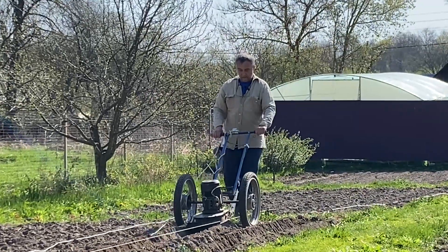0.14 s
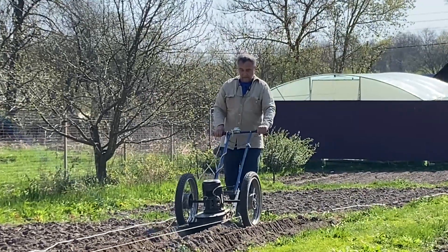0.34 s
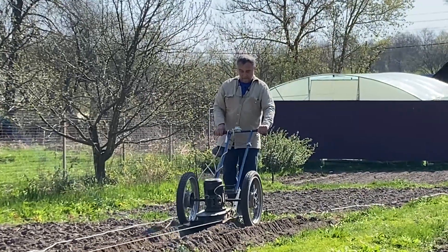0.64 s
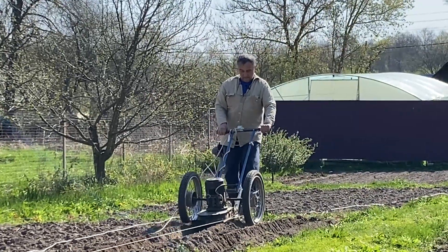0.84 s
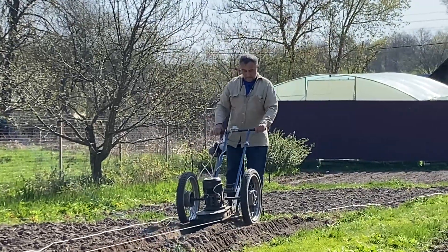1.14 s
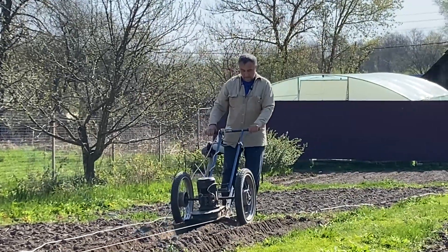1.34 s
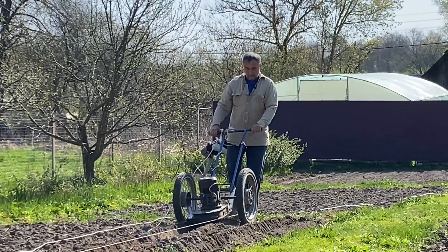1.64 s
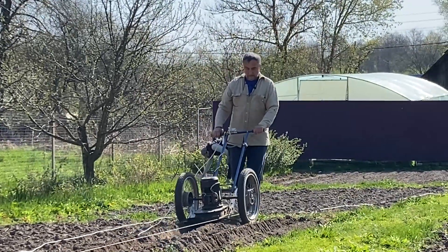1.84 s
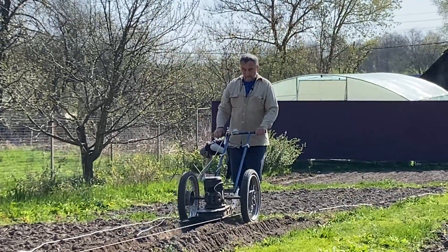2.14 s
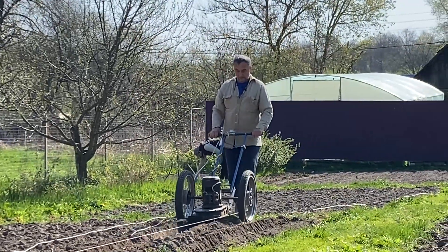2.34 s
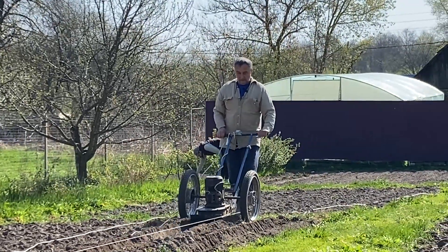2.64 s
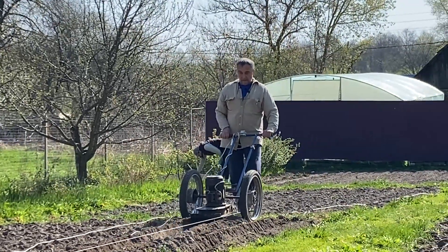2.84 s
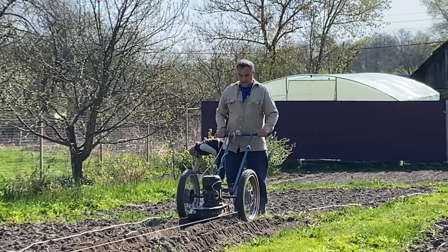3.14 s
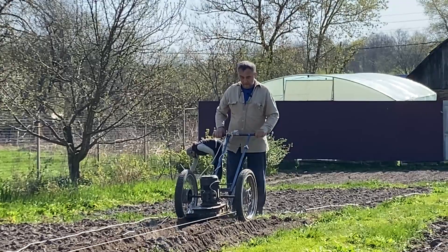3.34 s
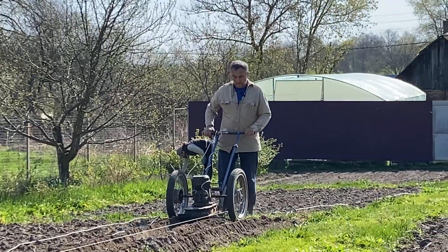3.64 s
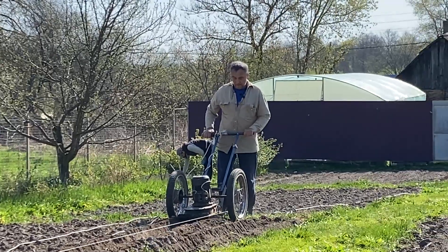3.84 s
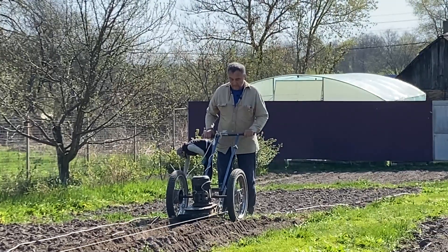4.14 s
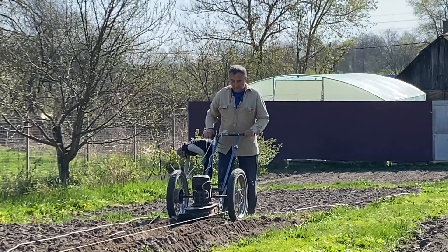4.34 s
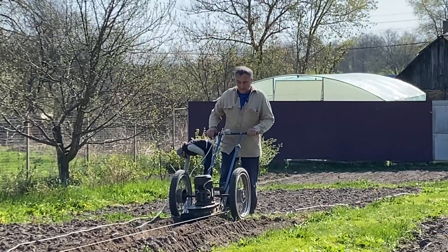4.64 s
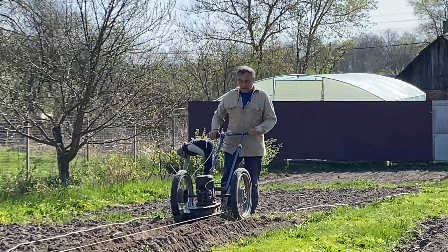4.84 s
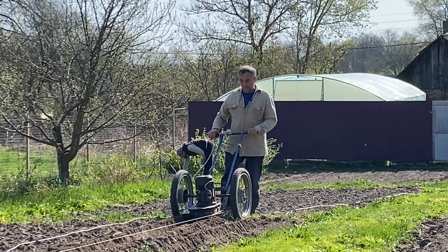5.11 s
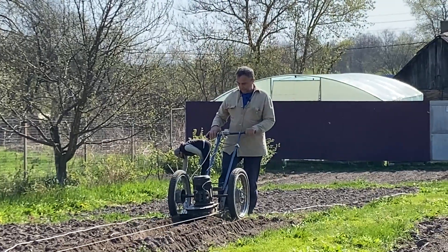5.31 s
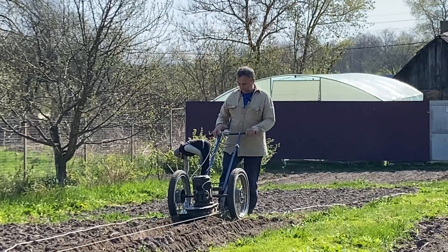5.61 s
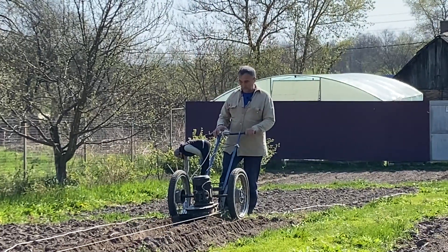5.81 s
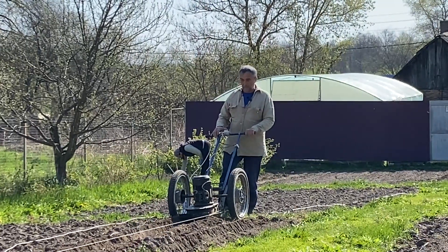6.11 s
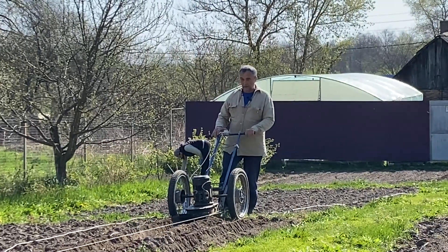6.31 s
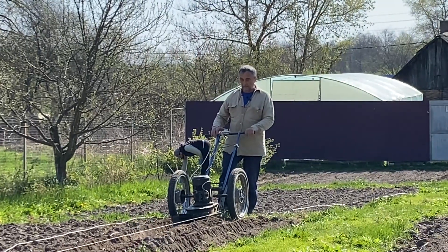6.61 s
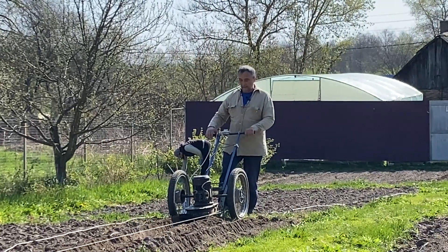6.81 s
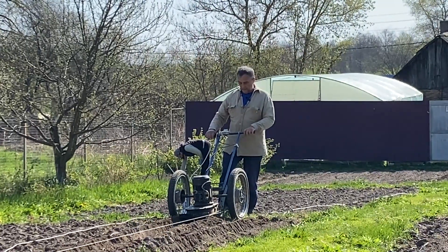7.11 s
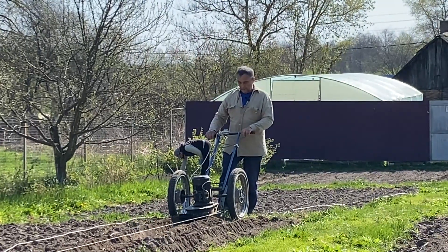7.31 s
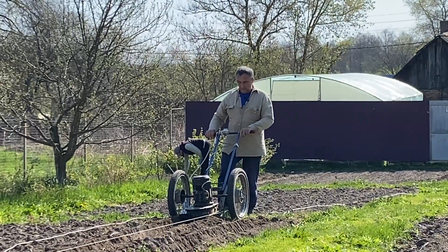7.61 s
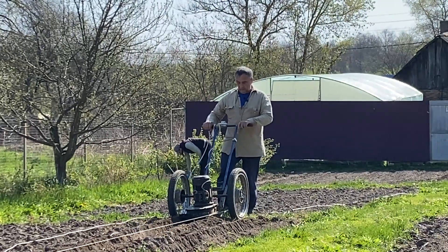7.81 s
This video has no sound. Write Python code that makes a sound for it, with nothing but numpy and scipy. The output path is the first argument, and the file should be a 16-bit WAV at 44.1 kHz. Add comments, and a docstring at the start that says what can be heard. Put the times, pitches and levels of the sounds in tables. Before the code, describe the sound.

From 0 to about 6.5 s an electric cultivator digs dry soil in a garden, a few metres from a single microphone. Its sound is a dense, loud metallic rattle of chassis, guard and tines, with bright scraping and spraying grit, a rough electrical buzz and gear whine near 640 and 1800 Hz. The colour drifts gently, and the low rattle grows slightly as it nears. Stones knock the tines at about 1.4, 1.7, 2.7, 2.9, 3.4, 4.6, 4.8, 5.1, 5.6, 6.1, 6.4 and 6.8 s; gears slap occasionally. Faint wind gusts brush the microphone. Switched off near 6.5 s, the machine loses load and pitch, stopping by 7.15 s with dull thumps from 6.8 s and small metallic clicks. Quiet garden air follows, with sparse clicks. A faint far bird whistles two short dipping notes near 7.6 and 7.7 s, then a lever snaps sharply at 7.8 s with a tiny high squeak.

```python
"""In a garden, an electric cultivator digs through dry soil a few metres from the microphone.
Random small impacts ring its chassis, frame, guard and tines; sine tones make the gear whine.
Stones strike the tines, gusts brush the microphone, and the colour glides as the machine rocks.
Switched off, it coasts to rest with thumps and clicks; a far bird whistles two notes, then a lever
snaps and a thin squeak sounds. Filtered noise makes the bed of quiet garden air."""
import sys
import numpy as np
from scipy import signal
from scipy.fft import rfft, irfft
from scipy.io import wavfile
from scipy.ndimage import uniform_filter1d

SR = 44100
rng = np.random.default_rng(int(sys.argv[2]) if len(sys.argv) > 2 else 0)


def to_wav(sig):
    """Store sig (one row per channel, or 1-D mono) as 16-bit WAV at the path in sys.argv[1].

    Samples outside -1..1 are clipped; the rate is SR.
    """
    pcm = np.clip(np.atleast_2d(sig), -1, 1) * 32767
    pcm = np.round(pcm).astype(np.int16)
    wavfile.write(sys.argv[1], SR, pcm.T)  # frames by channels


N = 351014
T = np.arange(N) / SR  # time [s]
HZ = np.fft.rfftfreq(8192, 1 / SR)  # frequencies at which filter gains are drawn [Hz]

# Levels in the tables are relative settings, ahead of wavering, colouring and mixing.
# quiet garden air: (frequency [Hz], level [dB])
AIR = [(12, -31.5), (20, -3.5), (54, 4), (92, -4), (274, -7), (324, -9.5), (631, -8.5), (2090, -22),
       (9930, -29.5), (14300, -28.5), (15500, -34)]
# low buffeting at the microphone: (frequency [Hz], level [dB])
BUFFET = [(10, -10.5), (33, -2.5), (70, -4.5), (140, -24.0), (500, -71.5)]
# gusts on the microphone: (time [s], half width [s], level [dB])
GUSTS = [(0.021, 0.058, -65), (1.41, 0.064, -52.5), (3.26, .035, -46), (3.33, .05, -54),
         (5.43, 0.043, -65.5)]
# far bird notes: (time [s], length [s], start pitch [Hz], lowest pitch [Hz], level [dB])
CHIRPS = [(7.566, .105, 3200, 2990, -79), (7.69, .075, 3170, 2990, -79)]
# dull echo off wall and trees: (frequency [Hz], level [dB])
ECHO = [(150, -5), (400, 1.5), (900, -4), (1500, -4), (2100, -15.5), (5000, -31.0)]

# thin squeak as the machine settles: (time [s], level [dB])
SQUEAK = [(7.772, -85), (7.79, -78), (7.822, -78), (7.838, -62), (7.85, -84), (7.87, -100)]
# released hand lever snaps back and bounces: (time [s], peak level [dB])
LEVER = [(7.7714, -44), (7.7738, -46), (7.784, -54)]
# what the lever rings with: (frequency [Hz], level [dB], 60 dB decay time [s])
LEVER_MODES = [(1180, -3, .025), (1590, -5, .065), (1840, -4, 0.098), (2780, -4, .035), (3500, -3, .035),
               (6100, -11, .03)]
# colour of the lever's crack: (frequency [Hz], level [dB])
CRACK = [(100, -15), (400, 1), (1500, 2), (3600, -5), (6500, -14), (9000, -28)]
# the last slow turns thump the chassis: (time [s], pitch [Hz], level [dB])
THUMPS = [(6.813, 290, -34), (6.849, 400, -34), (6.925, 340, -39), (7.038, 470, -46), (7.052, 288, -50),
          (7.105, 280, -57)]
# clicks of the stopping machine:
# (time [s], ringing knock level [dB], crunch level [dB], gritty top level [dB])
CLICKS = [(7.022, -55, -50, -59), (7.061, -60, -51, -54), (7.096, -73, -61, -70), (7.116, -67, -55, -66),
          (7.259, -53, -56, -49), (7.415, -49.5, -61, -51), (7.5148, -62, -68, -70), (7.749, -62, -74, -70),
          (7.8105, -53, -63, -78)]
# stones strike the tines: (time [s], ringing knock level [dB], crunch level [dB], gritty top level [dB])
STONES = [(1.384, -21.5, -28, -22), (1.652, -30, -23, -26), (2.694, -20.5, -23, -31),
          (2.931, -24, -16, -25.5), (3.374, -25, -23, -23), (4.64, -26.5, -16.5, -14.5),
          (4.839, -15, -24, -23.5), (5.1, -29, -15.5, -26), (5.609, -28, -19, -18), (6.076, -16, -20, -22),
          (6.405, -20, -23.5, -23), (6.797, -36, -29, -42)]
# what stones and clicks ring with: (frequency [Hz], level [dB], 60 dB decay time [s])
CLICK_MODES = [(525, 0.5, 0.077), (1050, -6, .025), (1300, -5.5, 0.038), (1515, 3.5, 0.043),
               (1880, -2.5, .06), (2800, -16.5, 0.044), (3510, -20, .04), (7100, -26, .2)]
# colours of each blow's crunch and of its gritty top: (frequency [Hz], level [dB])
CRUNCH = [(70, -44), (300, -2.5), (1200, 6.5), (3300, 1.5), (6500, -11), (9000, -22.0)]
GRITTY_TOP = [(3000, -25.0), (7000, -6), (10000, -9), (14500, -1.0)]

# shaft speed under load, ahead of coasting and unsteadiness: (time [s], speed [turns/s])
SPEED = [(0, 48.95), (1.6, 48.98), (2.1, 48.7), (2.75, 48.65), (3.2, 49.05), (4.8, 48.98), (5.4, 49.25)]
# tones of the drive: (multiple of the shaft speed, level [dB])
SHAFT_ORDERS = [(3, -57.5), (4, -53), (7, -64.5), (11, -46.5), (15, -54), (120, -59)]
# the two gear tones: (time [s], low mesh level [dB], high whine level [dB])
MESH = [(0, -35, -37.5), (.6, -41.5, -40), (1.5, -38.5, -37), (2.7, -33.5, -37.5), (3.4, -46.5, -43.5),
        (4.4, -37.5, -44), (5.2, -45, -44), (6.5, -45.5, -50)]
# gearbox rings up in surges as the load comes and goes: (time [s], level [dB])
GEAR_LOAD = [(0, -3), (.4, -5), (.7, -7), (1, -4), (1.2, -4.5), (1.65, -4.5), (1.8, -4.5), (2.2, -3.5),
             (2.4, -3), (2.6, -3), (2.85, -1.5), (3.05, -6), (3.3, -3.5), (3.47, -6), (3.7, -2.5), (4, -8),
             (4.35, -7.5), (4.6, -6), (4.85, -6), (5, -5.5), (5.6, -9.5), (6.4, -5.5)]
# the gears slap across their play: (time [s], peak level [dB])
GEAR_SLAPS = [(0.345, -18), (.483, -19), (.691, -16), (1.98, -13), (2.815, -15), (3.354, -16), (6.51, -17)]

# how hard the tines dig: (time [s], rattle level [dB], grit spray level [dB])
DIG = [(0, -25.5, -32.5), (1.15, -24, -33), (1.45, -25, -31), (2.1, -24, -31.5), (2.8, -24, -32),
       (3.1, -24, -32.5), (3.7, -24.5, -29.5), (4.05, -24.5, -30.5), (4.6, -24.5, -30.5),
       (5.2, -24.5, -29.5), (6, -24, -30), (6.35, -26, -30.5)]
# the tines bite into a clod (+) or slip through loose soil (-):
# (time [s], half length [s], rattle change [dB], spray change [dB])
BITES = [(0.986, 0.062, 1, 3.5), (1.547, 0.018, 2, 3.5), (2.005, 0.034, 0.5, 3), (2.28, 0.018, 0.5, 2.5),
         (2.403, 0.012, 0.5, 2), (3.112, 0.023, -2, -2.5), (4.36, 0.018, -2.5, -3.5),
         (4.64, 0.029, 1.5, 2.5), (4.747, 0.018, 3, 3.3), (4.83, 0.044, 1.5, 2.6), (5.9, 0.021, 2, 2.5),
         (6.054, .03, 2.2, 0.5), (6.407, 0.028, 3.5, 0.5), (6.77, 0.07, 4, 1.5), (6.964, 0.018, 3, 7)]
# two parts within the rattle: (time [s], guard level [dB], bracket level [dB])
PART_LEVELS = [(0, -6.5, -17), (1.3, -5, -17), (2.4, -7.5, -11.5), (3.3, -6.5, -11.5), (4.3, -5, -10),
               (4.8, -5.5, -10), (5.3, -5, -10.5), (6.4, -6.5, -12.5)]
# the tines sing as they lift clear of the soil:
# (time [s], main ring pitch [Hz], main ring level [dB], upper ring level [dB])
TINE_RING = [(0, 2860, -16.5, -24.5), (.7, 2890, -14, -20), (1.1, 2890, -13, -13), (1.45, 2900, -17, -18),
             (2, 2857, -8, -21), (2.75, 2896, -6, -18.5), (3.3, 2850, -8, -22), (3.7, 2820, -5.5, -16.5),
             (4.2, 2815, -10, -23), (4.8, 2880, -6, -20.5), (5.1, 2920, -15.5, -21),
             (5.55, 2750, -12.5, -13.5), (5.95, 2760, -10.5, -25), (6.4, 2710, -12.5, -28)]
# colours of chassis, frame, guard, scraping blades and grit: (frequency [Hz], level [dB])
CHASSIS = [(53, -43.5), (90, -13.5), (118, -22.5), (136, -8.5), (161, -9.5), (193, 2.5), (311, -2.5),
           (380, -7.5), (490, -26), (840, -120)]
FRAME = [(200, -43.5), (340, -21.5), (366, -11.5), (518, 2.5), (586, -5.5), (640, -1), (680, -7.5),
         (760, -9), (990, -30.5), (1670, -120)]
GUARD = [(410, -37.5), (700, -12.5), (776, -9), (822, 0.5), (952, -1), (1100, 0.5), (1210, -6.5), (1460, 2),
         (1600, -3.5), (1680, -1), (2180, -41.5), (3700, -120)]
SCRAPE = [(2180, -27.5), (3700, -19.5), (4040, -8), (4840, 1), (5450, -9.5), (5710, -5), (6610, 5),
          (7070, -0.5), (8270, -0.5), (8950, -9), (9500, -11.5), (12400, -41), (20900, -120)]
GRIT = [(5290, -42.5), (9000, -18.5), (9990, -5.5), (13200, 2), (15100, 6.5), (15700, -1.5)]
# metal resonances: (frequency [Hz], width [Hz], level [dB])
GEARBOX = [(1794, 46, 2.5), (1880, 62, -3.5), (2120, 90, -13.5)]
TINES = [(2785, 150, -1.5), (3090, 150, 0), (2510, 350, -5)]
BRACKET = [(1455, 53, 0)]
# tines and guard once the soil no longer damps them, ahead of squaring the gain:
# (frequency [Hz], width [Hz], level [dB])
FREE_RING = [(2785, 140, -1), (1570, 340, -2), (6350, 800, -11.5)]
# narrow resonances of the sheet metal covers: (frequency [Hz], width [Hz], boost [dB])
SHEET = [(940, 110, 1.5), (4830, 98, 1.5), (5880, 39, 6.5), (6560, 200, 0.5), (12850, 220, 6),
         (15000, 250, -1.5)]

# swells and hollows gliding as the machine rocks and its ground reflection shifts:
# (time [s], centre [Hz], level [dB])
GUARD_SWELL = [(0, 1002, -0.5), (3, 1003, 0.5), (4.3, 980, 3.5), (5.2, 1000, 1.5), (6.4, 1054, 1)]
TINE_SWELL = [(0, 3080, 4), (0.6, 3100, 2), (1.15, 3740, 2), (1.6, 3140, 3), (2.1, 3000, 4.5),
              (2.8, 3140, 4), (3.2, 2840, 5), (3.7, 2980, 4), (4.2, 2600, 4.5), (4.8, 2670, 2.5),
              (5.2, 2540, 7.5), (5.55, 3100, -0.5), (5.9, 2600, 3), (6.4, 2560, 5.5)]
LOW_HOLLOW = [(0, 3960, -4.5), (1.2, 4820, -5), (1.6, 4140, -6), (2.3, 3960, -7), (2.8, 4200, -5),
              (3.5, 4010, -6.5), (4.1, 3746, -2.5), (4.8, 3800, -4), (5.2, 3880, -1.5), (5.55, 4420, -7.5),
              (5.9, 3580, -1.5), (6.4, 3560, -5)]
MID_HOLLOW = [(0, 5230, -8), (0.75, 5380, -7.5), (1.2, 5960, -9), (1.7, 5550, -9.5), (2.3, 5200, -4.5),
              (2.8, 5750, -8.5), (3.2, 5340, -3), (3.6, 5760, -6.5), (4.05, 5100, -2), (4.8, 5840, -4),
              (5.3, 5300, -7.5), (5.65, 5140, -7), (6.4, 5190, -7)]
SCRAPE_SWELL = [(0, 7800, 5.5), (0.6, 7550, 4), (1.1, 7860, 6.9), (1.7, 7430, 6.5), (2.15, 6760, 4.3),
                (2.8, 7100, 2.5), (3.4, 6860, 5), (4.1, 6600, 8.2), (4.7, 6990, 5.5), (5.3, 6640, 2.3),
                (5.8, 6400, 1.8), (6.4, 5640, 3.5)]
GRIT_SWELL = [(0, 10170, 1), (.7, 10130, 2.5), (1.25, 10790, 1), (1.55, 12850, 2), (2.7, 14690, 4.5),
              (3.2, 14420, -4.5), (3.65, 12270, -1), (4.05, 10760, 5.5), (4.5, 12340, 0), (5.2, 14000, -2),
              (6.4, 11580, 0.5)]
GRIT_HOLLOW = [(0, 12360, -1), (.7, 12430, 0.5), (1.2, 15100, -3.5), (2.1, 11620, -1), (2.7, 13500, -4.5),
               (3.2, 11270, -4.5), (4.1, 10090, 1.5), (5.2, 10800, -6), (6.4, 10820, -5.5)]
# those bands: (path, half width [Hz])
GLIDES = [(GUARD_SWELL, 130), (TINE_SWELL, 540), (LOW_HOLLOW, 440), (MID_HOLLOW, 520), (SCRAPE_SWELL, 700),
          (GRIT_SWELL, 570), (GRIT_HOLLOW, 640)]

MAINS_HZ = 50
OFF_S = 6.461  # switch-off
COAST_S, COAST_BEND = 0.69, 1.5  # friction stops the shaft this long after the switch-off
UNLOAD_S = 0.031  # the tines stop pulling this soon after the switch-off
LOW_RISE_DB_PER_S = 0.6  # the chassis rattle grows as the machine comes nearer
TEETH, FINE_TEETH = 13, 37
UPPER_RING_HZ = 3493
GUARD_RIPPLE_DB, TINES_RIPPLE_DB = 2.2, 1.1
EDGE_HZ = 15780  # upper band limit of the recorder


def amp(db):
    """Decibels to gain."""
    return 10 ** (np.asarray(db) / 20)


def unit(x):
    """Scales to rms 1."""
    return x / np.sqrt(np.mean(x ** 2) + 1e-20)


def curves(rows, t=T):
    """The columns of a table, joined by straight lines in time."""
    s, *columns = np.transpose(rows)
    return [np.interp(t, s, c) for c in columns]


def add(mix, s, sound):
    """Mixes a sound in at time s."""
    part = mix[round(s * SR):][:len(sound)]
    part += sound[:len(part)]


def wander(rate_hz):
    """Random motion of rms 1, rolled off above the given rate."""
    f = np.fft.rfftfreq(N, 1 / SR)
    return unit(irfft(rfft(rng.standard_normal(N)) / (1 + (f / rate_hz) ** 2), N))


def spectrum(points):
    """Gain over frequency from (frequency [Hz], level [dB]) points."""
    f, db = np.transpose(points)
    return amp(np.interp(np.log(HZ + 1), np.log(f), db))


def resonances(modes):
    """Gain over frequency of a set of resonances, summed as powers."""
    power = 0
    for hz, width, db in modes:
        detuning = (HZ ** 2 - hz ** 2) / (width * (HZ + 1))
        power = power + amp(db) ** 2 / (1 + detuning ** 2)
    return np.sqrt(power)


def ring(x, gain):
    """Passes x through a causal filter of that gain, so blows ring on after they land; rms 1."""
    log_gain = np.log(np.maximum(np.r_[gain, gain[-2:0:-1]], 1e-5))
    minimum_phase = np.exp(np.conj(signal.hilbert(log_gain)))
    taps = np.fft.ifft(minimum_phase).real[:len(HZ)]
    return unit(signal.oaconvolve(x, taps)[:len(x)])


def resonate(x, hz, width_hz):
    """One resonance whose pitch may move: shifted to 0 Hz, through two equal poles, and back."""
    turn = np.exp(2j * np.pi * np.cumsum(hz * np.ones(N)) / SR)
    r = np.exp(-np.pi * width_hz / SR)  # width of each pole alone
    return unit((turn * signal.lfilter([1], np.poly([r, r]), x / turn)).real)


def decaying_modes(modes, t):
    """Sum of sines, each dying away at its own rate."""
    return sum(amp(db - 60 * t / t60) * np.sin(2 * np.pi * hz * t) for hz, db, t60 in modes)


def air(floor_db=-70, rumble_db=-72):
    """Quiet garden air, and low noise swelling in gusts as wind buffets the microphone."""
    wind = amp(rumble_db) * np.interp(T, [4.5, 7.3], [1, .2])  # the breeze eases
    for s, width, db in GUSTS:
        wind = wind + amp(db) * np.exp(-((T - s) / width) ** 2)
    buffet = ring(rng.standard_normal(N), spectrum(BUFFET))
    return wind * buffet + amp(floor_db) * ring(rng.standard_normal(N), spectrum(AIR))


def bird(lowest_at=.55, waver=.006, flutter_db=2.5):
    """Far, soft, slightly unsteady whistles that dip and turn up again."""
    out, sway, flutter = np.zeros(N), wander(60), wander(50)
    for s, length, start_hz, low_hz, db in CHIRPS:
        u = np.linspace(0, 1, round(length * SR))
        now = round(s * SR) + np.arange(len(u))
        glide_hz = low_hz + (start_hz - low_hz) * (1 - u / lowest_at) ** 2
        hz = glide_hz * (1 + waver * sway[now])
        level = amp(db + flutter_db * flutter[now]) * np.sqrt(abs(np.sin(np.pi * u)))
        add(out, s, level * np.sin(2 * np.pi * np.cumsum(hz) / SR))
    return out


def garden_echo(db=-69, t60=1.6, peak_s=6.6):
    """A dull echo off wall and trees: separate noise, swelling and fading about the switch-off."""
    return amp(db - 60 * abs(T - peak_s) / t60) * ring(rng.standard_normal(N), spectrum(ECHO))


def squeak(hz=7370, octave_db=-1):
    """A thin tone with its octave, swelling just before it stops."""
    angle = 2 * np.pi * np.cumsum(hz * (1 + .003 * wander(200))) / SR
    level = amp(curves(SQUEAK)[0]) * (T > SQUEAK[0][0]) * (T < SQUEAK[-1][0])
    return level * (np.sin(angle) + amp(octave_db) * np.sin(2 * angle))


def lever(crack_db=1, crack_t60=0.033):
    """The lever's snaps: a sharp crack of noise together with the lever's own ringing."""
    out, t = np.zeros(N), np.arange(SR // 5) / SR
    metal = decaying_modes(LEVER_MODES, t)
    for s, db in LEVER:
        crack = ring(rng.standard_normal(len(t)), spectrum(CRACK))
        snap = metal + amp(crack_db - 60 * t / crack_t60) * crack
        add(out, s, amp(db) * snap / abs(snap).max())
    return out


def tines_tail(db=-75.0, t60=.7, peak_s=7.14):
    """Faint undamped ringing of tines and guard: noise that swells as the shaft stops, then fades."""
    level = amp(db - 60 * abs(T - peak_s) / t60 + 2 * wander(40))
    return level * ring(rng.standard_normal(N), resonances(FREE_RING) ** 2)


def thumps(rise_s=.004, t60=.07):
    """Short dull notes of the chassis, each a decaying sine."""
    out, t = np.zeros(N), np.arange(SR // 5) / SR
    for s, hz, db in THUMPS:
        level = amp(db - 60 * t / t60) * np.minimum(t / rise_s, 1)
        add(out, s, level * np.sin(2 * np.pi * hz * t))
    return out


def knocks(rows, crunch_t60, knock_t60, grit_t60, rise_s=0.00072, lowest_hz=220):
    """Each blow is a knock that rings the metal and a short crunch, with grit on top."""
    out, t = np.zeros(N), np.arange(SR // 5) / SR
    metal = decaying_modes(CLICK_MODES, t)
    for s, *levels_db in rows:
        burst = rng.standard_normal(len(t)) * amp(-60 * t / crunch_t60) * (1 - np.exp(-t / rise_s))
        # knock and grit shorten the burst by a further decay of their own
        knock = signal.fftconvolve(burst * amp(-60 * t / knock_t60), metal)[:len(t)]
        crunch = ring(burst, spectrum(CRUNCH))
        grit = ring(burst * amp(-60 * t / grit_t60), spectrum(GRITTY_TOP))
        for db, part in zip(levels_db, (knock, crunch, grit)):
            add(out, s, amp(db) * part / abs(part).max())
    return signal.sosfilt(signal.butter(2, lowest_hz, "highpass", fs=SR, output="sos"), out)


def gear_slaps():
    """Single hard blows that ring the gearbox."""
    out = np.zeros(N)
    slap = ring(signal.unit_impulse(len(HZ)), resonances(GEARBOX))
    for s, db in GEAR_SLAPS:
        add(out, s, amp(db) * slap / abs(slap).max())
    return out


def coasting():
    """Share of the working speed: 1 until the switch-off, then down to rest."""
    return 1 - np.clip((T - OFF_S) / COAST_S, 0, 1) ** COAST_BEND


def shaft_angle():
    """Angle of the shaft [radians], slightly unsteady as the tines bite."""
    turns_per_s = curves(SPEED)[0] * coasting() * (1 + .0022 * wander(9.6))
    return 2 * np.pi * np.cumsum(turns_per_s) / SR


def whine(angle, hum_db=-65, waver_db=2.0):
    """Two gear tones and weaker shaft orders that fade with the speed, and mains hum."""
    orders = 0
    for k, db in SHAFT_ORDERS:
        tone = np.sin(round(k) * angle + 1.2 * wander(5.1))
        orders = orders + amp(db + waver_db * wander(8.6)) * tone
    low_db, high_db = curves(MESH)
    low_mesh = amp(low_db + 1.2 * wander(20)) * np.sin(TEETH * angle)
    high_whine = amp(high_db + 3.0 * wander(14)) * np.sin(FINE_TEETH * angle + 1.2 * wander(12))
    hum = amp(hum_db) * np.sin(2 * np.pi * 2 * MAINS_HZ * T) * (T < OFF_S)
    return np.sqrt(2) * ((orders + low_mesh + high_whine) * coasting() ** 14 + hum)


def effort(rattle_uneven_db=0.45, spray_uneven_db=0.24):
    """Levels of rattle and spray [dB]: the steady dig, single bites and uneven soil."""
    rattle_db, spray_db = curves(DIG)
    soil = wander(6.7)
    for s, length, bite_rattle_db, bite_spray_db in BITES:
        bite = np.exp(-((T - s) / length) ** 2)
        rattle_db = rattle_db + bite_rattle_db * bite
        spray_db = spray_db + bite_spray_db * bite
    return rattle_db + rattle_uneven_db * soil, spray_db + spray_uneven_db * soil


def digging(angle, slap_sharpness=.45):
    """Dense small impacts, bunched by shaft turns, torque ripple and clods, ring each machine part."""
    ripple = -np.cos(2 * np.pi * 2 * MAINS_HZ * T) * (T < OFF_S) * (1 + 0.27 * wander(1.4))
    turn = sum(slap_sharpness ** k * np.cos((k + 1) * angle) for k in range(3))
    turn = turn * (1 + 0.44 * wander(1.3))
    clods, chatter = wander(46), wander(210)
    speed = np.maximum(coasting(), 1e-3)
    busy = speed ** 1.109  # a slower shaft strikes fewer grains
    unloaded = np.clip((T - OFF_S) / UNLOAD_S, 0, 1)

    def impacts(per_s, turn_db, ripple_db, clod_db, chatter_db):
        """Random hits, per_s at working speed, with levels swayed by the four motions."""
        hits = rng.standard_normal(N) * (rng.random(N) < busy * per_s / SR) / np.sqrt(busy)
        sway_db = turn_db * turn + ripple_db * ripple + clod_db * clods + chatter_db * chatter
        return hits * amp(sway_db)

    def level(db, unload_db, speed_power):
        """A part drops when the load goes, then fades with a power of the speed."""
        return amp(db + unload_db * unloaded) * speed ** speed_power

    guard_db, bracket_db = curves(PART_LEVELS)
    ring_hz, ring_db, upper_db = curves(TINE_RING)

    hits = impacts(6000, turn_db=-0.5, ripple_db=2.5, clod_db=1.75, chatter_db=0.5)
    chassis = level(db=-20.5, unload_db=-3.5, speed_power=0.83) * ring(hits, spectrum(CHASSIS))

    hits = impacts(6000, turn_db=0.76, ripple_db=1.4, clod_db=0.8, chatter_db=0.9)
    frame = level(db=-7.0, unload_db=-5, speed_power=1.6) * ring(hits, spectrum(FRAME))

    hits = impacts(5000, turn_db=0.0, ripple_db=GUARD_RIPPLE_DB, clod_db=0.93, chatter_db=1.0)
    guard = level(db=guard_db, unload_db=-5.0, speed_power=1.7) * ring(hits, spectrum(GUARD))

    hits = impacts(9000, turn_db=2.5, ripple_db=0.4, clod_db=0.47, chatter_db=1.0)
    gear_level = level(db=curves(GEAR_LOAD)[0], unload_db=-7, speed_power=1.7)
    gearbox = gear_level * ring(hits, resonances(GEARBOX))

    hits = impacts(5000, turn_db=0.0, ripple_db=-2.0, clod_db=-4.5, chatter_db=1.5)
    bracket = level(db=bracket_db, unload_db=-3.5, speed_power=2.8) * ring(hits, resonances(BRACKET))

    hits = impacts(10000, turn_db=0.06, ripple_db=TINES_RIPPLE_DB, clod_db=1.06, chatter_db=1.0)
    tines = level(db=-7.5, unload_db=-6.5, speed_power=2.0) * ring(hits, resonances(TINES))

    tip_hits = impacts(10000, turn_db=1.5, ripple_db=TINES_RIPPLE_DB, clod_db=1.0, chatter_db=0.4)
    main_ring = amp(ring_db) * resonate(tip_hits, ring_hz, 190)
    upper_ring = amp(upper_db) * resonate(tip_hits, UPPER_RING_HZ, 260)
    singing = level(db=-0.5, unload_db=-3, speed_power=1.5) * (main_ring + upper_ring)

    hits = impacts(22000, turn_db=0.62, ripple_db=0.5, clod_db=1.18, chatter_db=0.24)
    scrape = level(db=-4.5, unload_db=-6.5, speed_power=2.47) * ring(hits, spectrum(SCRAPE))

    hits = impacts(23000, turn_db=0.5, ripple_db=0.5, clod_db=1.5, chatter_db=0.0)
    grit = level(db=-1.5, unload_db=-6, speed_power=3.0) * ring(hits, spectrum(GRIT))

    hits = impacts(3500, turn_db=-2.5, ripple_db=-2, clod_db=0.5, chatter_db=6.0)
    free_level = unloaded * level(db=-7, unload_db=-0.5, speed_power=2.4)
    free = free_level * ring(hits, resonances(FREE_RING) ** 2)

    rattle_db, spray_db = effort()
    nearing_chassis = amp(LOW_RISE_DB_PER_S * T) * chassis
    rattle = nearing_chassis + frame + guard + gearbox + bracket + tines + singing + free
    return amp(rattle_db) * rattle + amp(spray_db) * (scrape + grit)


def sheet_metal(x, trim_db=-0.5):
    """The covers ring at a few narrow pitches."""
    boost_db = sum(db / (1 + (2 * (HZ - hz) / width) ** 2) for hz, width, db in SHEET)
    return ring(x, amp(boost_db)) * x.std() * amp(trim_db)


def shifting_colour(x, ripple_db=2.1, patch_db=1.0):
    """Swells and hollows glide as the machine moves; uneven ground mottles the treble."""
    hz, t, z = signal.stft(x, SR, nperseg=1024)

    def mottle(bins, frames):
        """Random field of rms 1, smoothed over frequency and time."""
        field = rng.standard_normal(z.shape)
        for _ in range(2):
            field = uniform_filter1d(field, size=bins, axis=0)
            field = uniform_filter1d(field, size=frames, axis=1)
        return unit(field)

    fine, broad = mottle(4, 30), mottle(14, 25)
    treble = np.clip(hz / 5000, 0, 1)[:, None]
    colour_db = (ripple_db * fine + patch_db * broad) * treble
    for path, width_hz in GLIDES:
        centre_hz, db = curves(path, t)
        band_db = db * np.exp(-((hz[:, None] - centre_hz) / width_hz) ** 2)
        # taking off the mean keeps each part's own colour on average
        colour_db += band_db - band_db[:, t < OFF_S].mean(axis=1, keepdims=True)
    return signal.istft(z * amp(colour_db), SR, nperseg=1024)[1][:N]


def scene():
    """The machine at work, and the garden around it."""
    garden = air() + bird() + garden_echo()
    clicks = knocks(CLICKS, crunch_t60=0.085, knock_t60=0.019, grit_t60=.06)
    stopping = squeak() + lever() + tines_tail() + thumps() + clicks
    stones = knocks(STONES, crunch_t60=0.074, knock_t60=0.0054, grit_t60=.08)
    angle = shaft_angle()
    running = shifting_colour(sheet_metal(digging(angle)) + whine(angle))
    return (garden + stopping + stones + gear_slaps() + running)[None]


def record(dry):
    """The recorder's band limit: a steep low-pass filter."""
    low_pass = signal.firwin(1023, EDGE_HZ, window=("kaiser", 9), fs=SR)
    return signal.oaconvolve(dry, low_pass[None], "same")


dry = scene()
out = record(dry)
to_wav(out)
```